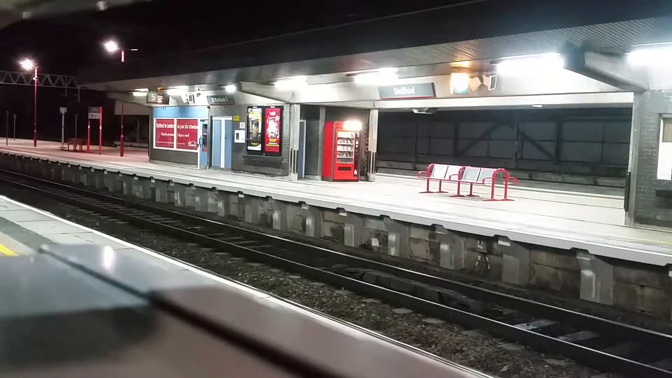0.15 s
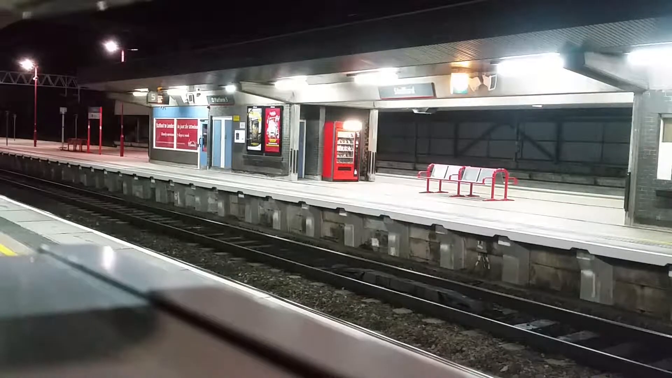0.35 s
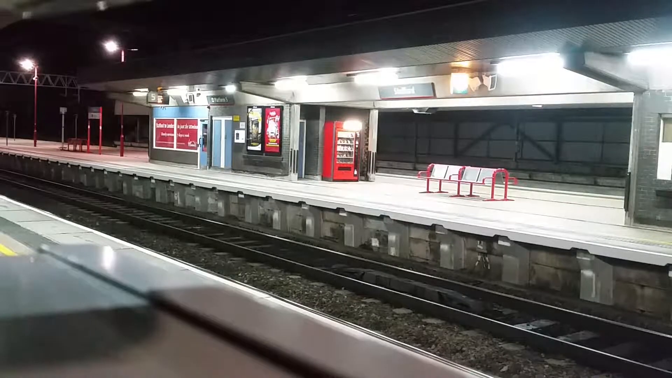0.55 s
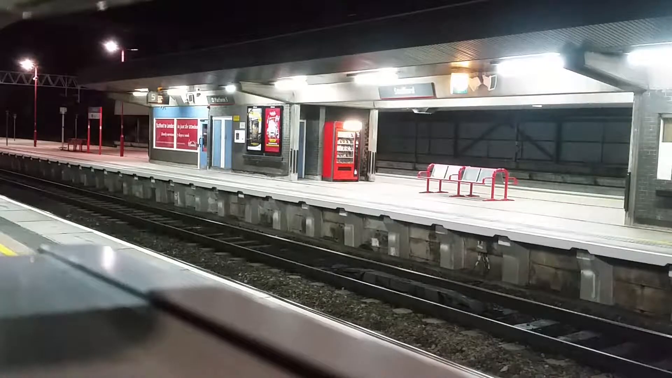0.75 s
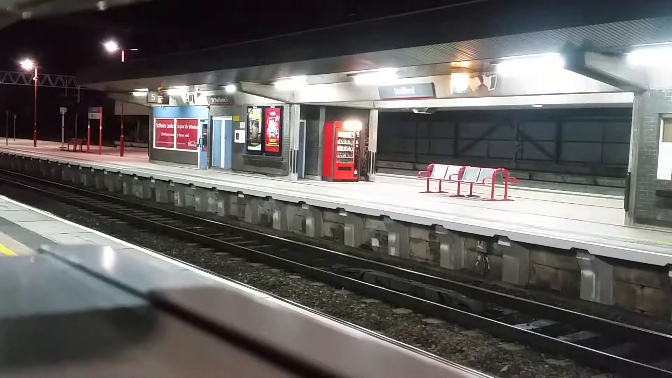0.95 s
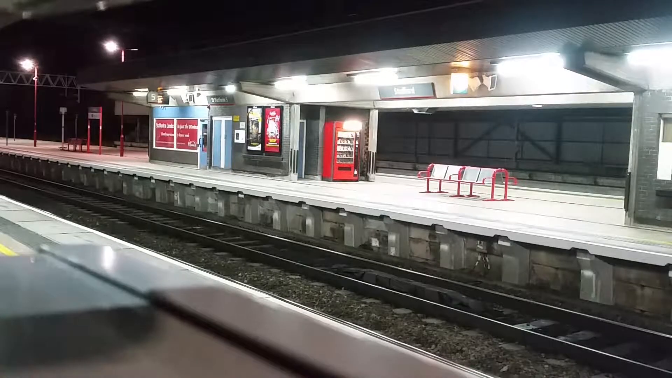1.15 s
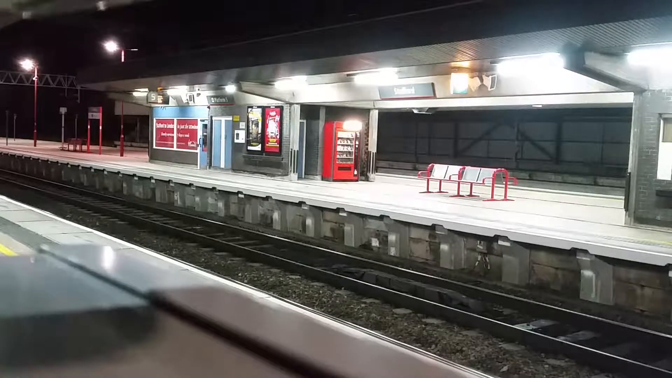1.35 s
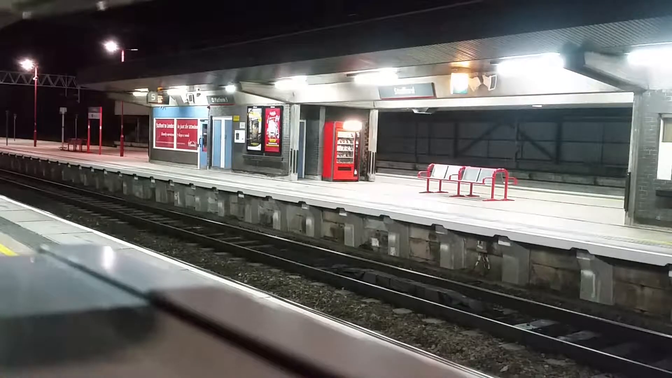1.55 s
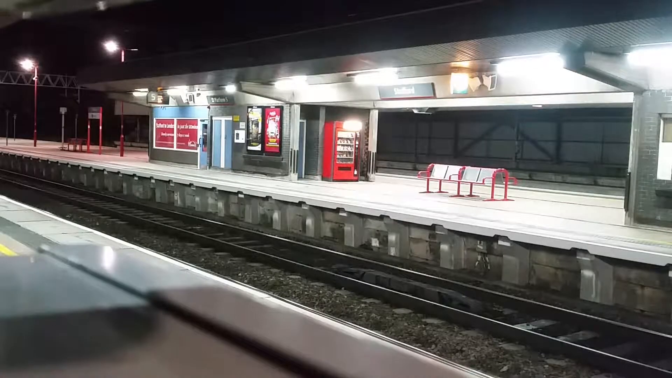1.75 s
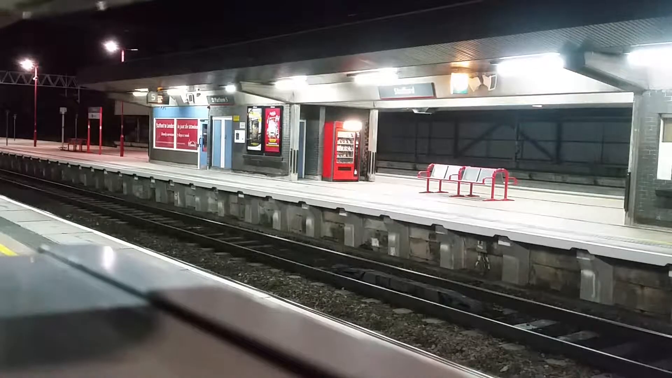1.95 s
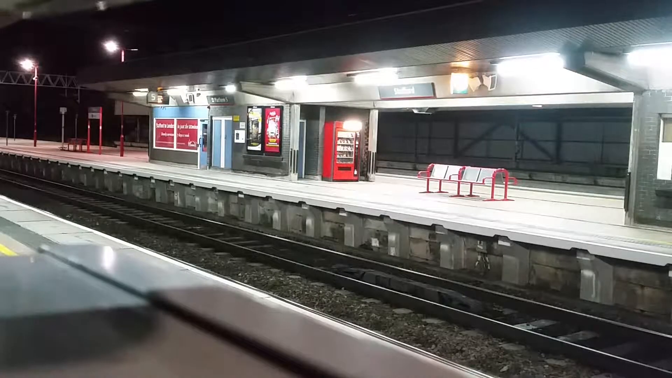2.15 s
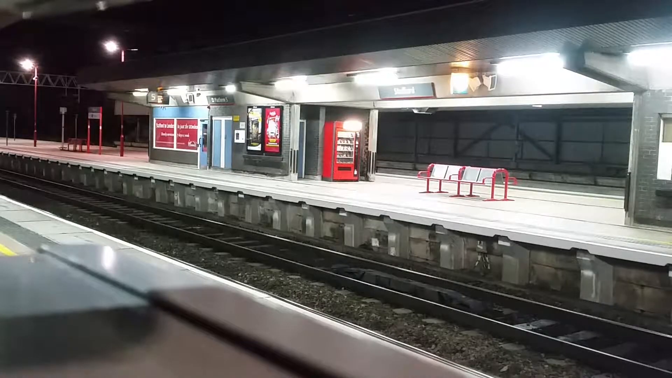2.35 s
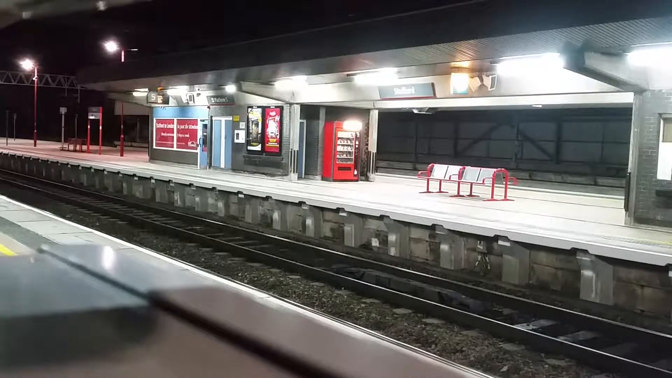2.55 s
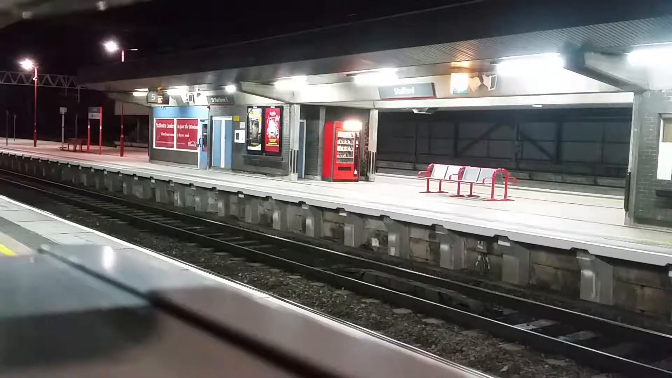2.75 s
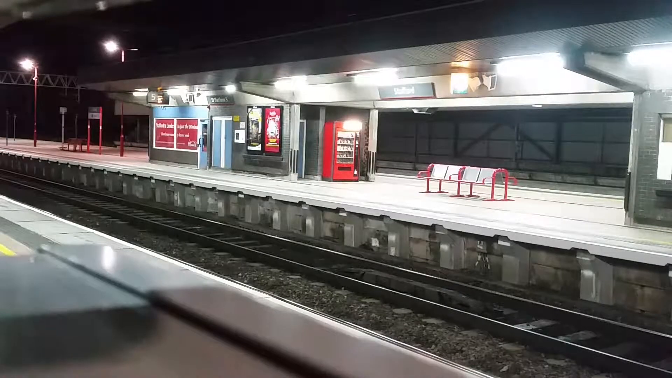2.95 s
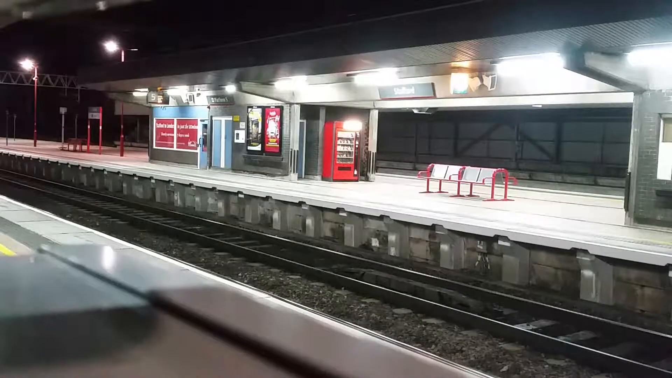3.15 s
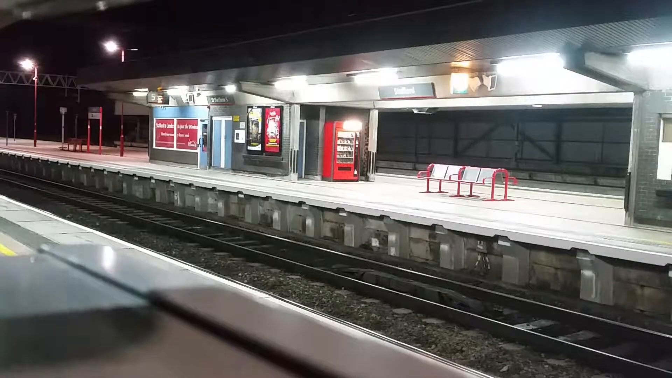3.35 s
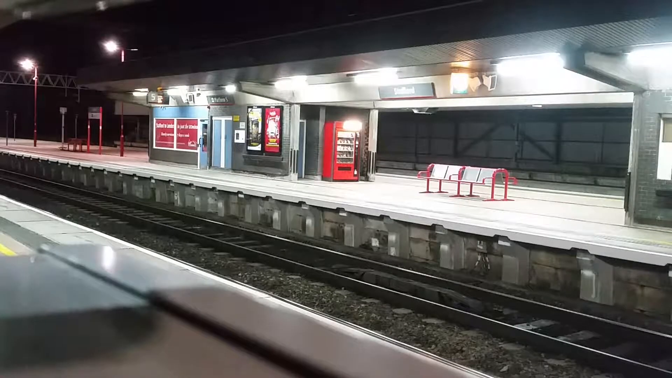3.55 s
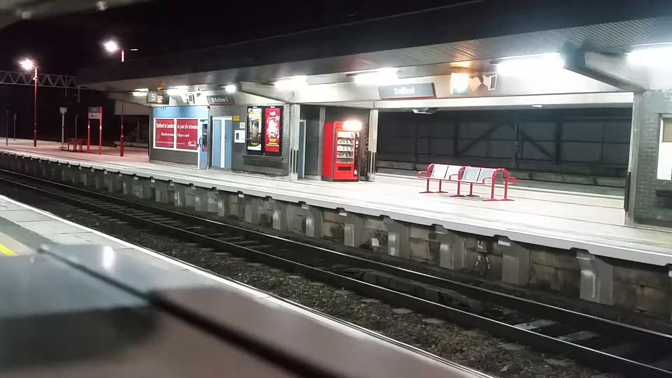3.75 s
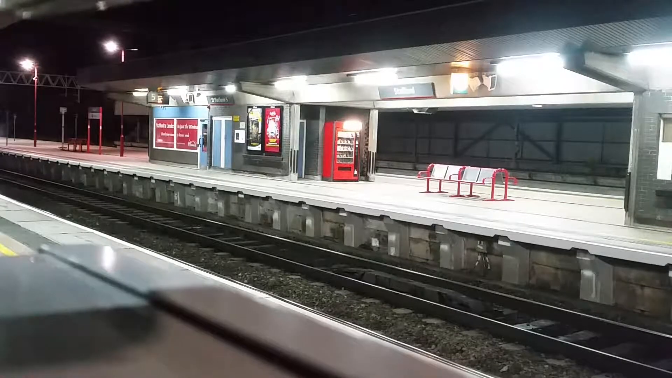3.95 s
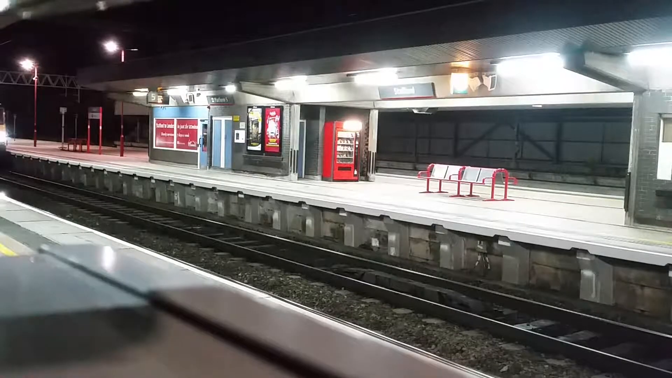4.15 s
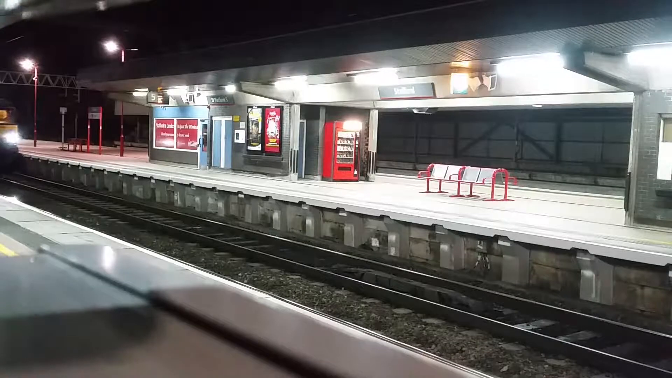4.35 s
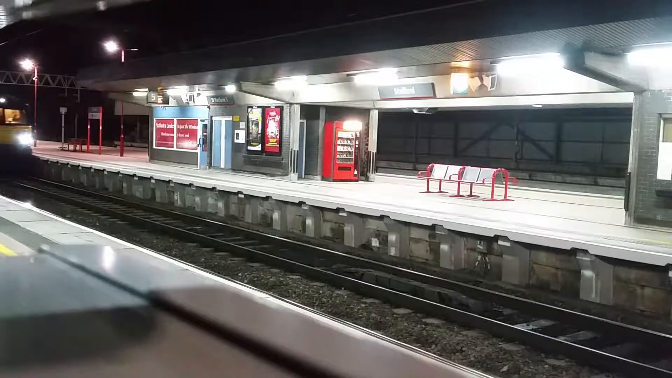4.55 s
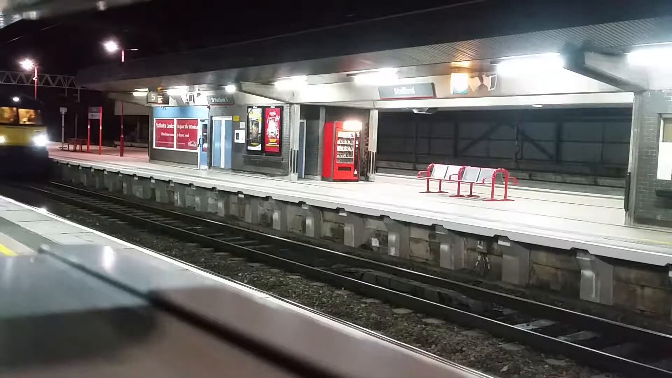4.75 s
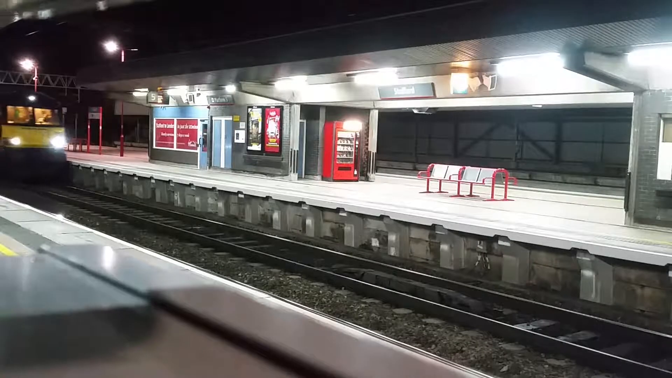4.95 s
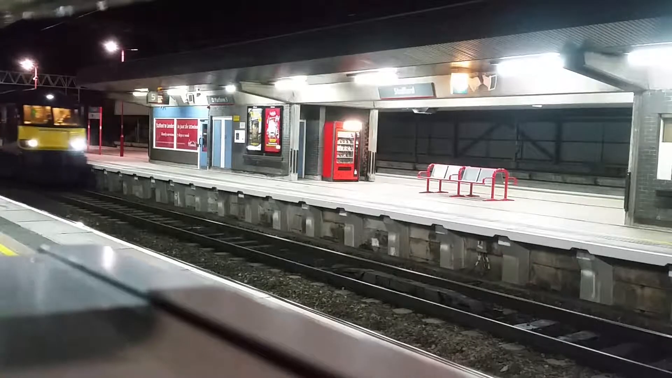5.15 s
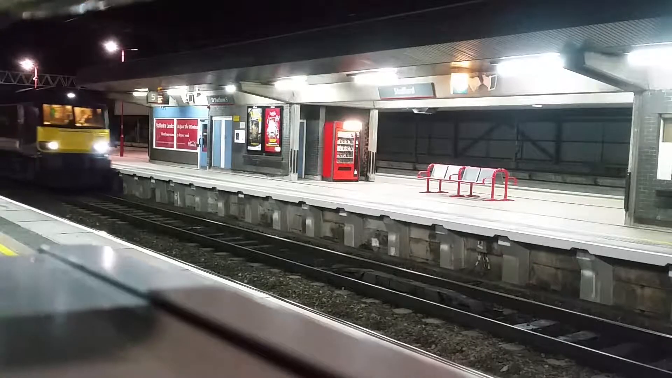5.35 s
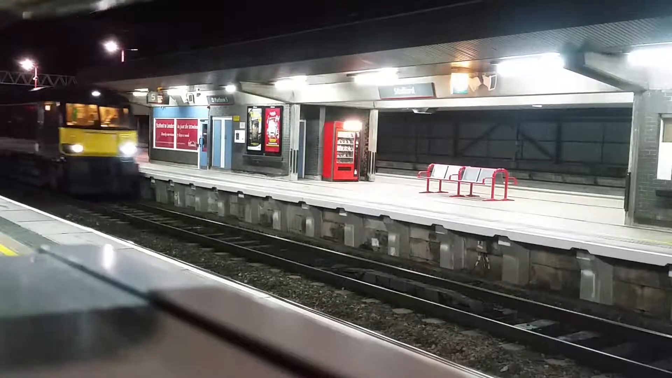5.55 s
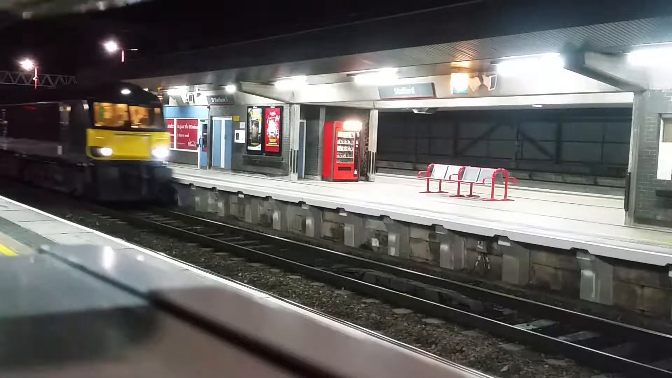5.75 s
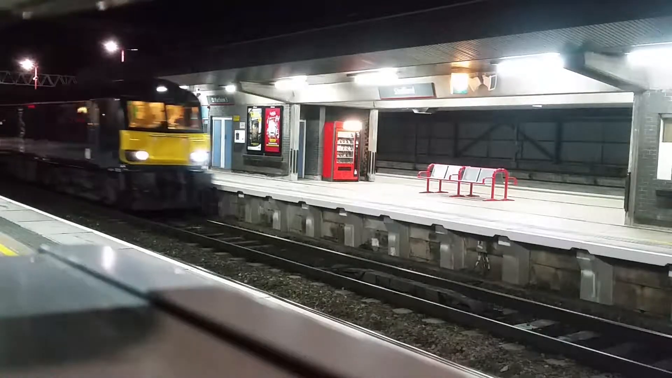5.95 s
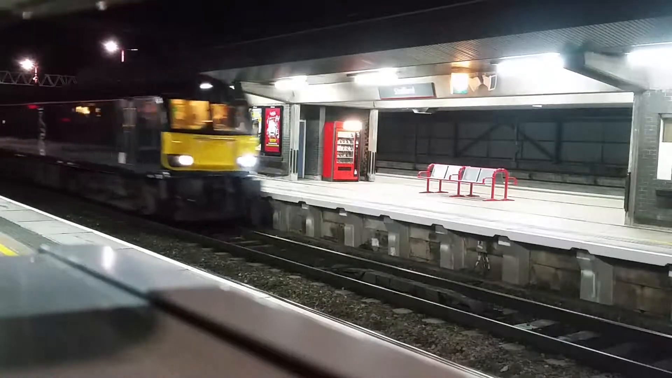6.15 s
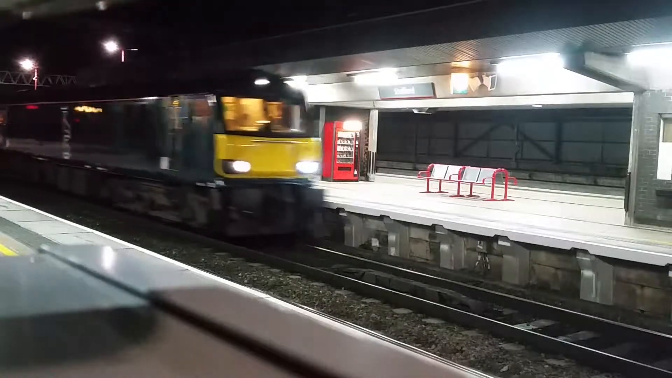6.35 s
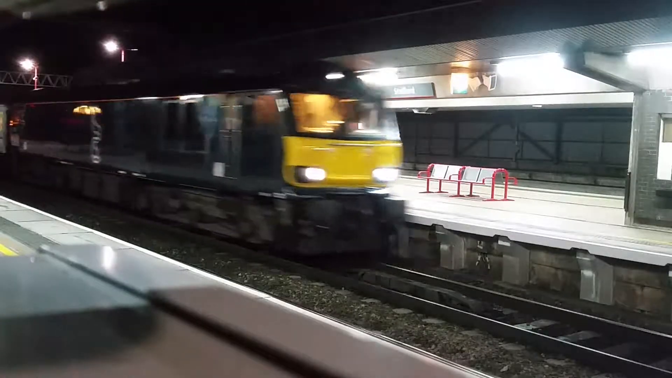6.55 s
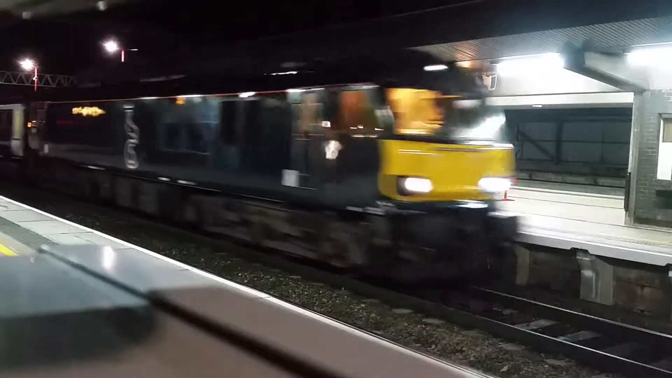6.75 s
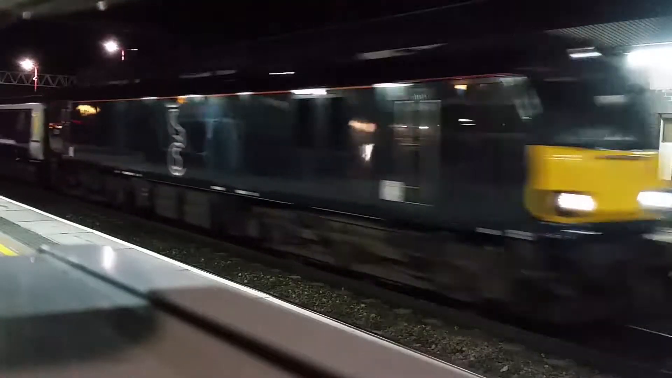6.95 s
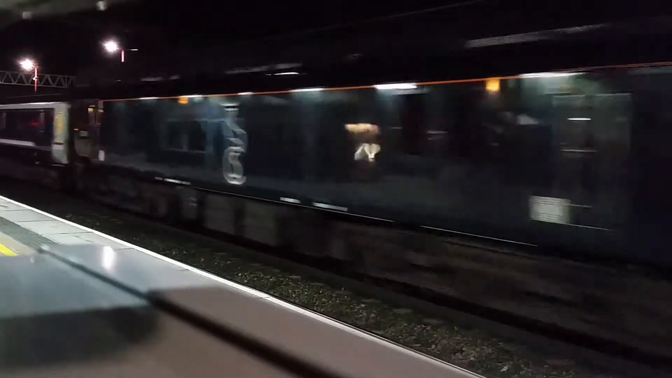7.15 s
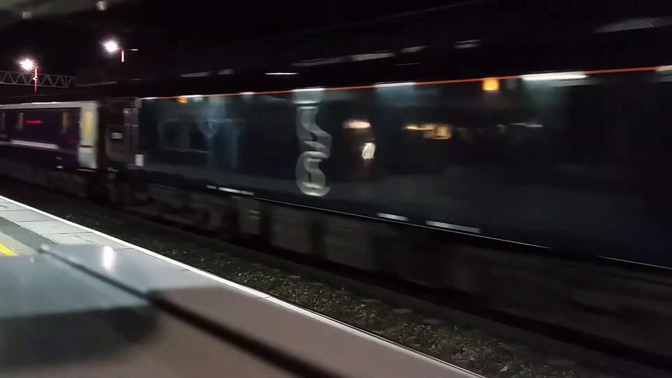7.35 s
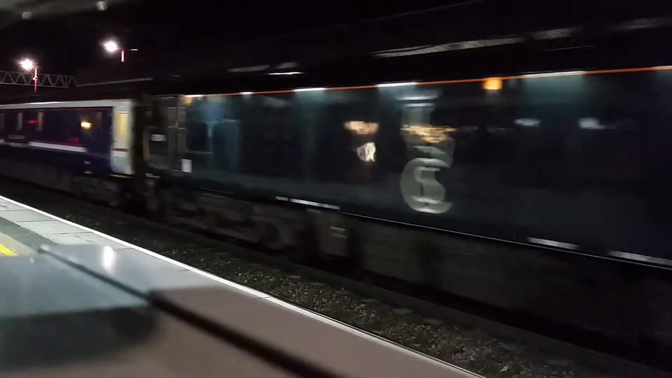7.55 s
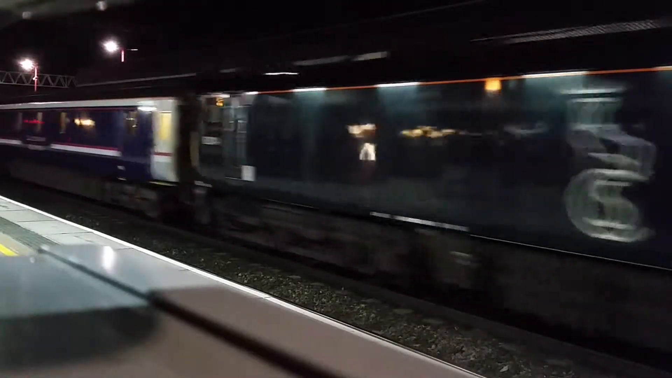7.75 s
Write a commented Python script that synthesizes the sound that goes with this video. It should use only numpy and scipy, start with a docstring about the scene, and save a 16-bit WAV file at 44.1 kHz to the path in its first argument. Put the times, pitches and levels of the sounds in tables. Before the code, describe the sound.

Quiet night platform with faint hum and a few nearby clicks; a fast train approaches, roaring, whining and thudding until it sweeps close past.

```python
"""The roar of a distant electric train is heard first, over a low hum and the night air of a roofed station.
Something small clicks close by early on, while roar, rumble, hiss and ringing tones grow.
Thuds and brief squeals join in as the leading wheels near; they come abreast shortly before the end.
Broad sounds are shaped noise, partly alike at two spaced microphone ports; tones are blurred sinusoids,
except the hum, a wavering sinusoid, and the clicks, noise bursts with decaying modes and reflections."""
import sys
import numpy as np
from scipy import signal
from scipy.fft import rfft, irfft
from scipy.io import wavfile
from scipy.ndimage import uniform_filter1d, minimum_filter1d

SR = 44100
rng = np.random.default_rng(int(sys.argv[2]) if len(sys.argv) > 2 else 0)


def store_wav(level_fs):
    """Save 16-bit WAV to argv[1]."""
    pcm = np.round(np.clip(np.atleast_2d(level_fs), -1, 1) * 32767)
    wavfile.write(sys.argv[1], SR, pcm.T.astype(np.int16))


N = 343980
TIME, BINS = np.arange(N) / SR, np.fft.rfftfreq(N, 1 / SR)  # seconds and Hz

# the leading wheels come abreast at ABREAST_S, on a track TRACK_M away
SPEED_M_PER_S, ABREAST_S, TRACK_M = 23.98, 7.355, 4.5
ROOF_S = 6  # the locomotive runs in under the roof
# resonances of the vehicle bodies: (frequency [Hz], width [Hz], lift [dB])
BODY_MODES = [(247, 6.6, 3.8), (279, 11, 1.6), (450, 23, 2.6), (732, 23, 2.2), (725, 27, 2.5)]


def gain_of(db):
    """Logarithmic level: 20 dB is a factor of ten in amplitude."""
    return 10 ** (np.asarray(db) / 20)


def evened(x):
    """Power normalization: scales to rms 1."""
    return x / np.sqrt(np.mean(x ** 2) + 1e-20)


def read(points, hz):
    """Spectral interpolation: a spectrum's value, linear along a log-frequency axis."""
    f, value = np.transpose(points)
    return np.interp(np.log(hz + 1), np.log(f + 1), value)


def curves(rows):
    """Envelope interpolation: each column of a table at every sample."""
    s, *columns = np.transpose(rows)
    return [np.interp(TIME, s, c) for c in columns]


def swell(centre_s, width_s):
    """Gaussian envelope: a smooth rise and fall, 0-1."""
    return np.exp(-.5 * ((TIME - centre_s) / width_s) ** 2)


def add(mix, s, sound):
    """Superposition: mixes a stereo sound in at s seconds."""
    part = mix[:, round(s * SR):][:, :sound.shape[1]]
    part += sound[:, :part.shape[1]]


def drift(rate_hz, size=N):
    """Low-pass noise: a slow random fluctuation, scaled to rms 1 over the whole run."""
    s = TIME[::64]
    lowpass = 1 + (np.fft.rfftfreq(len(s), s[1]) / rate_hz) ** 4
    slow = rfft(rng.standard_normal(len(s))) / lowpass
    return np.interp(TIME[:size], s, evened(irfft(slow, len(s))))


def likeness(hz):
    """Spatial coherence: how alike diffuse sound is at two spaced ports."""
    # (frequency [Hz], left-right correlation [-1 to 1])
    coherence = [(60, 0.97), (180, 0.99), (300, 0.96), (450, 0.89), (620, 0.75), (780, 0.48), (950, 0.15),
                 (1350, -0.37), (2200, .16), (3300, -0.26), (4600, 0.23), (8000, -0.031)]
    return np.clip(read(coherence, hz), -.99, .995)


def leaning(hz):
    """Port response: half the left-right level difference, as an amplitude factor."""
    # colour of the two microphone ports: (frequency [Hz], left-right difference [dB])
    ports = [(60, 0.7), (280, 0.86), (450, 3), (620, 6.5), (790, 11), (950, 7.5), (1300, 3.5), (2200, 2),
             (3300, -2), (4500, -5.5), (5500, -7), (6700, 1.5), (8200, -4), (11000, -8), (13500, -0.5)]
    return gain_of(read(ports, hz) / 2)


def at_ports(a, b, same, lean):
    """Partial coherence: the right port shares a part of a and takes the rest from independent b."""
    return np.array([a * lean, (same * a + np.sqrt(1 - same ** 2) * b) / lean])


def diffuse(colour, modes=()):
    """Diffuse field: noise shaped by resonances reaches two ports from all sides; the mono sum has rms 1."""
    lowest_hz, highest_hz = colour[0][0], colour[-1][0]
    # 12 dB an octave beyond the range of the table
    ends = np.minimum(1, np.minimum(BINS / lowest_hz, highest_hz / (BINS + 1))) ** 2
    size = gain_of(read(colour, BINS)) * ends
    for hz, width_hz, lift_db in modes:
        size = size * gain_of(lift_db / (1 + (2 * (BINS - hz) / width_hz) ** 2))
    a, b = rfft(rng.standard_normal((2, N)))
    same, lean = likeness(BINS), leaning(BINS)
    mono_size = np.sqrt(lean ** 2 + lean ** -2 + 2 * same)  # the colour applies to the mono sum
    x = irfft(at_ports(a, b, same, lean) * size / mono_size, N)
    return x / x.mean(0).std()


def fuzzy_tone(hz, blur_hz, steady):
    """Multipath fading: a steady carrier plus a share blurred by many paths; the mono sum has rms 1."""
    steady = np.clip(steady, 0, 1)
    shaking = np.array([drift(blur_hz, size=len(hz)) for _ in range(4)])
    blurred = np.sqrt((1 - steady) / 2) * (shaking[:2] + 1j * shaking[2:])
    a, b = blurred + np.sqrt(steady) * np.array([[1], [1j]])
    pair = at_ports(a, b, likeness(hz.mean()), leaning(hz.mean()))
    tone = (pair * np.exp(2j * np.pi * np.cumsum(hz) / SR)).real
    return tone / tone.mean(0).std()


def ahead():
    """Uniform motion: metres the leading wheels still have to run; negative once they are past."""
    return SPEED_M_PER_S * (ABREAST_S - TIME)


def carried(full_db, within_m, loss_db_per_m):
    """Linear attenuation: the level in dB of a sound that dies away along the line."""
    return full_db - loss_db_per_m * np.maximum(ahead() - within_m, 0)


def closeness():
    """Spherical spreading: amplitude of the nearest wheels through the air, 1 once alongside."""
    return TRACK_M / np.hypot(np.maximum(ahead(), 0), TRACK_M)


def approaching(far, near):
    """Power crossfade: the sound of the far train gives way to the sound of the near one."""
    direct_m, handover_m = 25.7, 18.5  # distance of equal shares, and scale of the logistic change
    share = 1 / (1 + np.exp((ahead() - direct_m) / handover_m))
    return np.sqrt(1 - share) * far + np.sqrt(share) * near


def surging():
    """Roughness excitation: how rough the rail under the wheels is, 0-1."""
    # rougher rail, met about once a second: (time [s], strength [0-1])
    surges = [(3.92, 0.5), (5.08, 0.67), (6.28, 1), (7.4, 0.54)]
    return sum(strength * swell(s, .19) for s, strength in surges)


def brief_lifts():
    """Transient envelope: brief lifts of the roar in dB, rising quickly and dying away."""
    # (onset [s], peak lift of the roar [dB])
    lifts = [(3.205, 4.5), (3.955, 1.5), (5.265, 2), (6.21, 2), (6.515, 1.5), (6.665, 1.5)]
    rise_s = 0.022
    ages = [(np.maximum(TIME - s, 0) / rise_s, lift_db) for s, lift_db in lifts]
    return sum(lift_db * age * np.exp(1 - age) for age, lift_db in ages)


def rolling(roar_db=-1.73, near_db=1.34, roar_surge_db=0.6, rush_surge_db=2.0, growl_db=-24):
    """Roughness excitation: rolling shakes track (roar) and steel (rush); the roughest stretches growl."""
    # spectra of far and near sound: (frequency [Hz], relative level per Hz [dB])
    roar_far = [(150, -38), (260, -10.5), (330, -1.5), (500, 1.5), (640, 0.5), (790, -2), (860, -6.5),
                (1050, -15), (1500, -62.5)]
    roar_near = [(150, -3.5), (260, -14), (330, 3), (460, 2), (600, -2), (740, -2.5), (840, -16),
                 (1050, -47), (1500, -61.5)]
    rush_far = [(500, 0.5), (850, 0), (1080, 0), (1270, -7), (1550, -7), (1800, -7), (2080, -10),
                (2350, -17), (2650, -18.5), (3100, -25.5), (4500, -59.5)]
    rush_near = [(500, -18), (850, 0.5), (1080, -2.5), (1270, -4.5), (1550, -6.5), (1800, -10.5),
                 (2080, -8), (2350, -11.5), (2650, -15.5), (3100, -18.5), (4500, -42.5)]
    # growl of rough rail: (frequency [Hz], relative level per Hz [dB])
    growl_colour = [(400, -16), (560, -4.5), (640, -0.5), (790, 2), (880, -9.5), (1100, -16.5), (1400, -30)]
    # resonances of track and wheels: (frequency [Hz], width [Hz], lift [dB])
    track_modes = [(140, 18, 4), (252, 20, 11), (289, 26, 4), (431, 8.2, 2), (624, 4.4, 2.5),
                   (777, 30, 4.2)]
    wheel_modes = [(953, 29, 2.8), (1140, 25, 1.3), (1640, 30, 1.5), (1765, 40, 2), (2640, 120, 3.5)]
    # how hard the wheels shake the track: (time [s], relative roar level [dB])
    roar_level = [(0.0, -36.5), (0.15, -37), (1.97, -30), (3.17, -29), (3.3, -26.5), (3.91, -21.5),
                  (4.47, -21.5), (5.0, -16.5), (5.67, -17.5), (6.12, -16.5), (6.55, -12.5), (7.78, -16),
                  (7.8, -19)]
    # (full level before surges [dB], full within [m], loss beyond that [dB/m])
    rush_carry = (-29.3, 47, 0.12)

    near_roar = diffuse(roar_near, BODY_MODES) * gain_of(near_db)
    roar = approaching(diffuse(roar_far, track_modes), near_roar)
    rush = approaching(diffuse(rush_far, wheel_modes), diffuse(rush_near, wheel_modes))
    jolts, surge = drift(13), surging()  # uneven rail jolts roar and rush together
    roar_lift_db = roar_db + roar_surge_db * surge + brief_lifts() + .55 * jolts
    roar = roar * gain_of(curves(roar_level)[0] + roar_lift_db)
    rush = rush * gain_of(carried(*rush_carry) + rush_surge_db * surge + 0.51 * jolts)
    # the growl gives way as the wheels come alongside
    growl = diffuse(growl_colour) * surge * (1 - closeness()) * gain_of(growl_db + 2.5 * drift(35))
    return roar + rush + growl


def rumble(surge_db=1.2, alongside_db=2):
    """Forced vibration: bodies and bogies drone, weight shakes the ground, the roofed space booms."""
    # spectra: (frequency [Hz], relative level per Hz [dB])
    drone_colour = [(60, -45), (100, -13.5), (120, -4), (138, 3), (185, 0.5), (215, -0.5), (255, 0.5),
                    (300, 0.5), (400, -8), (700, -61)]
    ground_colour = [(15, -40), (30, -27.5), (40, -7), (52, -2), (65, -2), (85, 1), (110, -8), (200, -19.5),
                     (400, -73.5)]
    boom_colour = [(30, -29), (42, -3), (52, 0.5), (62, -10), (85, -27.5)]
    # deep rumble of the ground: (time [s], level [dB])
    ground_level = [(0, -50), (2, -49.5), (3.5, -44), (4.8, -37.5), (5.9, -33.5), (6.3, -38), (6.65, -45.5),
                    (7.1, -37), (7.8, -38)]
    # (full level before lifts [dB], full within [m], loss beyond that [dB/m])
    drone_carry = (-19.5, 1, 0.15)

    lift_db = surge_db * surging() + alongside_db * closeness() ** 2
    lift_db = lift_db + 3 * swell(4.82, .15)  # the drone swells briefly
    lift_db = lift_db + 1.5 * swell(ROOF_S, 0.12)
    drone = diffuse(drone_colour, BODY_MODES) * gain_of(carried(*drone_carry) + lift_db)
    ground = diffuse(ground_colour) * gain_of(curves(ground_level)[0])
    boom = diffuse(boom_colour) * gain_of(-37) * swell(6.35, .17)
    return drone + ground + boom


def hissing(fizz_db=-57.0, alongside_db=3.0, hiss_surge_db=1.5, sizzle_surge_db=3):
    """Broadband noise: hiss and a thin high sizzle grow on the approach; the near hiss flutters."""
    # spectra: (frequency [Hz], relative level per Hz [dB])
    hiss_far = [(2000, -18), (3000, -3.5), (3800, 0.5), (4600, -2), (5500, -6), (6150, -8), (6650, 1.6),
                (6950, -6), (7350, -12), (8000, -36), (10000, -38.5), (16000, -46)]
    hiss_near = [(2000, -29.5), (3000, 2), (3800, 4.5), (4600, 1), (5500, 1), (6150, 0.5), (6650, -4.5),
                 (7400, -4), (8300, -7), (10000, -17.5), (13500, -28), (15700, -36)]
    sizzle_colour = [(8000, -22), (11100, -9.5), (11550, 5.5), (13000, 7.5), (14000, 1), (14600, -7),
                     (16000, -14)]
    fizz_colour = [(6000, -14), (8500, -3), (10500, -0.5), (13300, 0.5), (15000, -5), (15700, 0.5)]
    # (full level before lifts [dB], full within [m], loss beyond that [dB/m])
    hiss_carry = (-47, 63, 0.17)
    sizzle_carry = (-67, 58, 0.11)
    # first axles sweeping past: (time [s], lift of the near hiss and fizz [dB])
    axles = [(7.38, 1.8), (7.6, 0.3), (7.76, 1.5)]

    axle_lift_db = sum(lift_db * swell(s, .05) for s, lift_db in axles)
    flutter = gain_of(1.3 * drift(30) + axle_lift_db)
    close, surge = closeness(), surging()
    hiss = approaching(diffuse(hiss_far), diffuse(hiss_near) * flutter)
    hiss_db = carried(*hiss_carry) + hiss_surge_db * surge + alongside_db * close + .55 * drift(12)
    sizzle = diffuse(sizzle_colour) * gain_of(carried(*sizzle_carry) + sizzle_surge_db * surge)
    fizz = diffuse(fizz_colour) * flutter * close * gain_of(fizz_db)  # comes only through the air
    return hiss * gain_of(hiss_db) + approaching(sizzle, fizz)


def singing():
    """Tonal radiation: drive whines and rail rings grow until the roof is reached, then most fade."""
    # whines of the drive: (starting frequency [Hz], level on reaching the roof [dB],
    # loss with distance [dB/m], fade under the roof [dB/s], blur [Hz], steady share [0-1])
    drive_whines = [(357, -30, .098, 0, 5.5, .35), (699, -37, .058, 4, 5, .35), (1408, -43, .2, 6, 17, .2),
                    (1424, -42, .25, 6, 13, .3), (1754, -52.5, .065, 4.5, 16, .3)]
    # rings of rails and wheels: (constant frequency [Hz], then the same columns)
    rail_rings = [(178.2, -30, .36, 1.5, 3, 0.37), (247.1, -35, .15, 2, 4, .25),
                  (489, -27.3, .17, 2.5, 3.7, .55), (759.6, -29, 0.15, 6, 11, 0.29),
                  (2022, -50, .12, 2, 25, .1)]

    before_roof_s, under_roof_s = np.minimum(TIME, ROOF_S), np.maximum(TIME - ROOF_S, 0)
    to_roof_m = SPEED_M_PER_S * np.maximum(ROOF_S - TIME, 0)
    # the whines climb slowly, then sink, wavering throughout (shares of their pitch)
    pitch = 1 + .0065 * before_roof_s - .006 * under_roof_s + .0015 * drift(2.01)
    whines = [(hz * pitch, *rest) for hz, *rest in drive_whines]
    rings = [(np.full(N, hz), *rest) for hz, *rest in rail_rings]
    return sum(fuzzy_tone(hz, blur_hz, steady) * gain_of(db - loss * to_roof_m - fade * under_roof_s)
               for hz, db, loss, fade, blur_hz, steady in whines + rings)


def hum():
    """Periodic excitation: a low electric hum as one sinusoid, wavering in level and phase."""
    # (time [s], rms level before wavering [dB])
    hum_level = [(0, -49.5), (1.6, -48.5), (2.1, -59), (2.85, -40.5), (3.3, -45), (4.1, -42), (5.2, -49),
                 (7.8, -51)]
    hum_hz = 101.8
    level_db = curves(hum_level)[0] + 1.6 * drift(4.6)
    return np.sqrt(2) * gain_of(level_db) * np.sin(2 * np.pi * hum_hz * TIME + .5 * drift(4.3))


def ambience(level_db=-47):
    """Diffuse background: the steady night air of the station lies under everything."""
    # (frequency [Hz], relative level per Hz [dB])
    air_colour = [(20, -23), (31, -12.5), (41, -0.5), (56, -3.5), (90, -10), (175, -6.5), (240, -9),
                  (600, -14.5), (1500, -25), (2500, -28), (3100, -28), (3900, -27.5), (4600, -40.5),
                  (6000, -65.5), (16000, -76)]
    return diffuse(air_colour) * gain_of(level_db)


def echoes(x, first_s=.018, t60=.27, per_s=2000):
    """Reverberation: sparse, decaying reflections from the platform, walls and roof."""
    t = np.arange(SR // 2) / SR
    strengths = rng.standard_normal((2, len(t)))
    arrives = rng.random((2, len(t))) < per_s / SR
    taps = strengths * arrives * (t > first_s) * gain_of(-60 * t / t60)
    taps = taps / np.linalg.norm(taps, axis=1, keepdims=True)
    return signal.oaconvolve(x, taps, axes=1)[:, :N]


def clicks(snap_t60=.01, snap_db=-1, ring_db=-3, ping_db=-11, ping_t60=0.023, room_db=-12):
    """Modal impact: a small hard thing snaps shut in several contacts; each rings all modes and a ping."""
    # contacts: (time [s], relative peak [dB], left-right difference [dB], ping frequency [Hz])
    contacts = [(1.298, -36, -5, 5000), (1.3058, -33, -5, 4100), (1.313, -42, -4, 7000),
                (1.3188, -35.5, -4.5, 5600), (1.3265, -41, -4, 7000), (1.3374, -38, -2, 4250),
                (1.3791, -27, -9, 5990), (1.386, -39, -3, 5990), (1.4329, -20, -10, 4950),
                (1.4433, -25, 2, 6980), (1.4486, -34, -4, 3480)]
    # snap spectrum: (frequency [Hz], relative level [dB])
    click_colour = [(300, -4), (1000, 1), (2400, 1), (3000, -4), (3600, 4.5), (4400, 4.5), (5000, 3.5),
                    (7000, 1.5), (9000, -9), (11700, -12), (13200, -6), (16000, -10)]
    # modes of the clicking thing: (frequency [Hz], relative level [dB], 60 dB decay time [s])
    click_modes = [(740, -10, .05), (1150, -14, .035), (2150, -16, .03), (3480, -20, .05),
                   (3820, -11, .011), (4250, -12, .015), (4950, -15, .015), (5650, -18, .018),
                   (6960, -16, 0.024), (7400, -14, 0.016), (8650, -19, .012), (9800, -19, .013),
                   (10900, -19, .012), (12300, -22, .014)]

    out, t = np.zeros((2, N)), np.arange(SR // 5) / SR
    colour = gain_of(read(click_colour, np.fft.rfftfreq(len(t), 1 / SR)))
    rise = 1 - np.exp(-(t / .0011) ** 2)
    for s, peak_db, pan_db, ping_hz in contacts:
        noise = irfft(rfft(rng.standard_normal((2, len(t)))) * colour, len(t))
        snap = evened(noise) * gain_of(snap_db - 60 * t / snap_t60)
        ring = 0
        for hz, db, t60 in [*click_modes, (ping_hz, ping_db, ping_t60)]:
            cycles = hz * t + rng.random() + rng.random((2, 1)) / 2  # phases differ left and right
            ring = ring + gain_of(ring_db + db - 60 * t / t60) * np.sin(2 * np.pi * cycles)
        sides_db = np.array([[pan_db], [-pan_db]]) / 2
        add(out, s, (snap + ring) * rise * gain_of(peak_db + sides_db))
    return out + gain_of(room_db) * echoes(out)


def thuds(level_db=-9, blur_hz=18, steady=.8):
    """Transient resonance: heavy bogies lurch and the body gives one short low note each time."""
    # (onset [s], relative peak [dB], frequency [Hz])
    lurches = [(4.78, -18.5, 170), (6.01, -13, 191), (6.119, -14, 175), (6.249, -16, 186),
               (6.669, -17, 135), (7.149, -15, 148), (7.309, -11, 211), (7.471, -15, 164.5),
               (7.659, -14, 132.3)]
    out, t = np.zeros((2, N)), np.arange(SR // 4) / SR
    age = t / 0.034  # time in units of the rise time
    shape = (age * np.exp(1 - age)) ** 2
    for s, peak_db, hz in lurches:
        tone = fuzzy_tone(np.full(len(t), hz), blur_hz, steady)
        add(out, s, tone * shape * gain_of(peak_db + level_db))
    return out


def squeals():
    """Wheel resonance: single wheels sing out briefly, some of them gliding in pitch."""
    # (centre [s], half-length to -3 dB [s], frequency at centre [Hz], glide [Hz/s], level [dB])
    wheel_squeals = [(5.1, .1, 772, 0, -29), (5.75, .13, 1462, -0.5, -42), (5.87, .08, 490, 1.5, -25),
                     (6.2, .05, 2055, -350, -43), (6.2, .1, 1467, 0, -39.5), (6.67, .06, 2040, -300, -44),
                     (6.85, .12, 637, 2, -26), (7.1, .06, 1490, -220, -40), (7.3, .18, 690, -30, -26.5),
                     (7.32, .025, 1456, -250, -39), (7.76, .05, 488, 2, -26),
                     (7.75, 0.048, 1468, -150, -39)]
    out = np.zeros((2, N))
    for s, half_s, hz, glide_hz_per_s, db in wheel_squeals:
        t = np.arange(-2 * half_s, 2 * half_s, 1 / SR)
        tone = fuzzy_tone(hz + glide_hz_per_s * t, blur_hz=12, steady=0.79)
        add(out, s + t[0], tone * np.cos(np.pi / 2 * t / t[0]) * gain_of(db))
    return out


def scene():
    """Superposition: the train, the hum, the station's air and the near clicks."""
    train = rolling() + rumble() + hissing() + singing() + thuds() + squeals()
    return train + hum() + ambience() + clicks()


def record(dry):
    """Gain limiting: the highest peaks are held under full scale; then a low-pass limits the band."""
    allowed = .93 / np.maximum(abs(dry).max(0), .93)
    held = dry * uniform_filter1d(minimum_filter1d(allowed, size=441), size=441)  # 10 ms windows
    lowpass = signal.firwin(511, 15730, window=("kaiser", 9), fs=SR)
    return signal.oaconvolve(held, lowpass[None], "same", axes=1)


dry = scene()
out = record(dry)
store_wav(out)
```